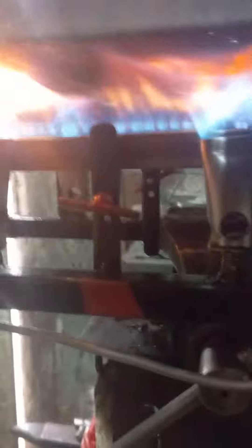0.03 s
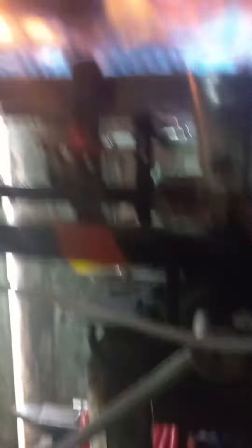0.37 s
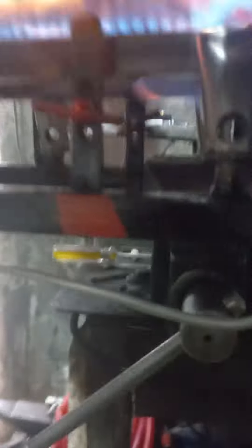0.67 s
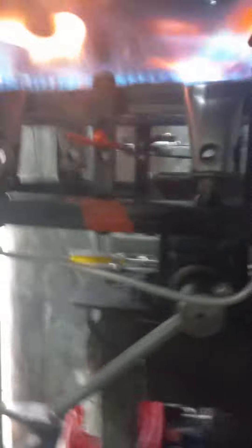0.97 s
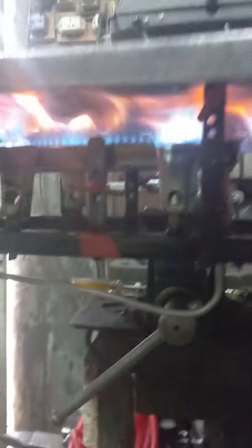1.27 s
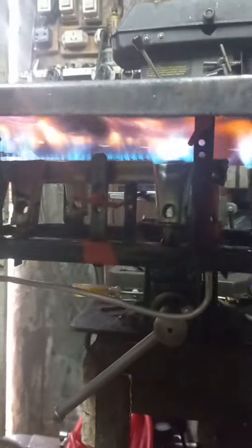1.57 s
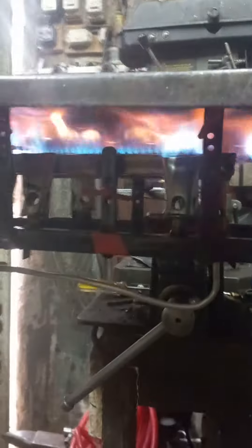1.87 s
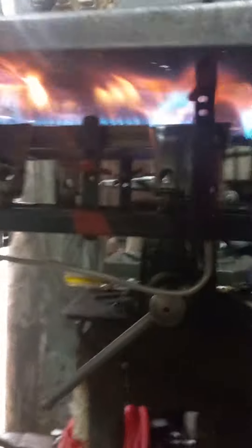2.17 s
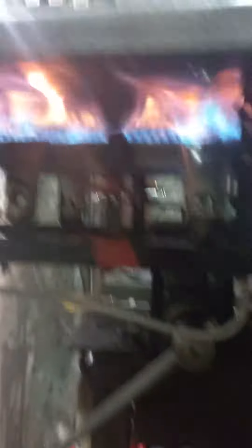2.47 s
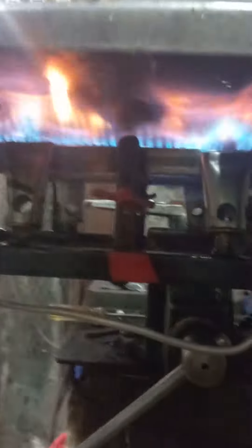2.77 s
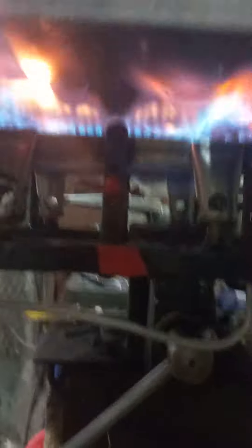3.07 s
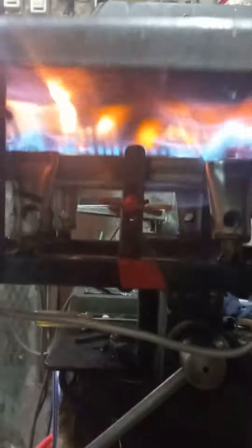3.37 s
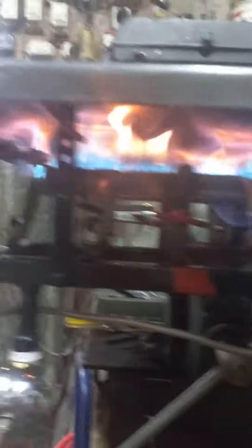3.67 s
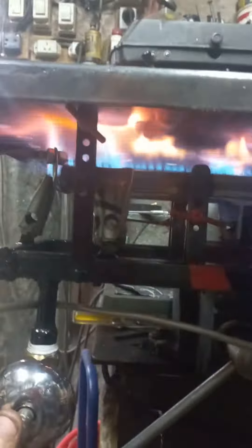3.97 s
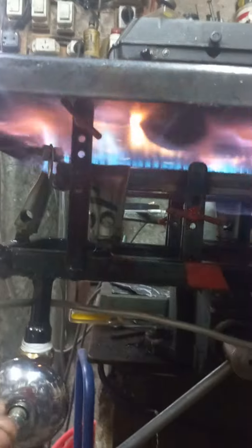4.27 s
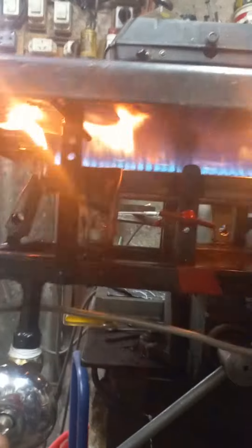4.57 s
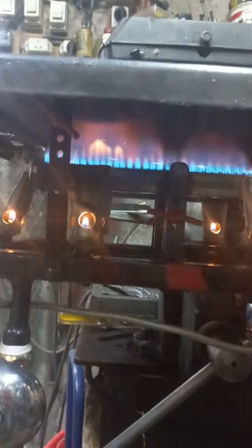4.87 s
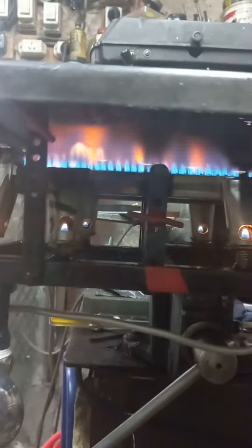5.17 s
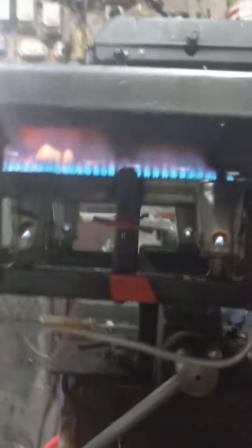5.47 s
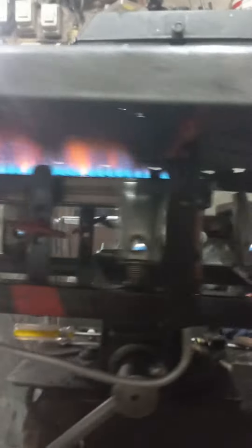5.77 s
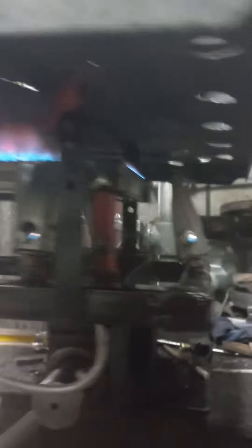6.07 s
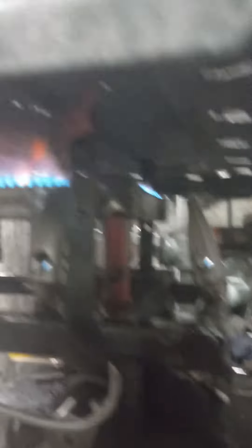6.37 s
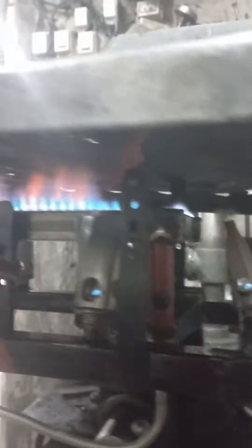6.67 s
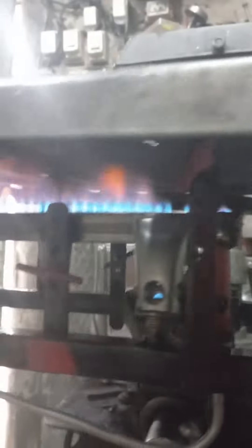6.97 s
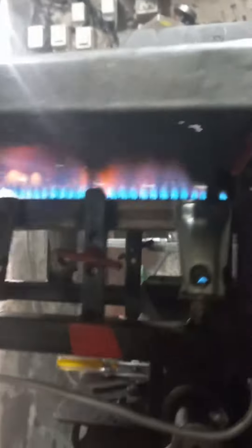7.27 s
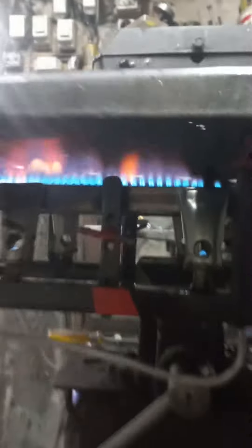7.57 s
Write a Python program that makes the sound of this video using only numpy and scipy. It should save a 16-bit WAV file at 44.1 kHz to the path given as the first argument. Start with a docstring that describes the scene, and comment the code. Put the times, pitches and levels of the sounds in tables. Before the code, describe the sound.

Loud, rumbling gas flames with a few metal ticks suddenly drop to near quiet, leaving a thin hiss and soft puffs.

```python
"""In a workshop, a long gas burner roars under a steel plate, heard from a phone in a shifting grip.
Turbulent flames boom and flutter in the room, the gas jets hiss, and hot metal ticks now and then.
The valve is turned down: small flames murmur and puff, and a thin flow sings in the mixing tubes.
The tone shifts as the phone sways and travels along the burner; hand and sleeve brush against it."""
import sys
import numpy as np
from scipy import signal
from scipy.fft import rfft, irfft
from scipy.io import wavfile

SR = 44100
rng = np.random.default_rng(int(sys.argv[2]) if len(sys.argv) > 2 else 0)


def unload_audio(sound):
    """Save the sound as a 16-bit wav file, at the path given as the first command line argument."""
    columns = np.transpose(np.atleast_2d(sound))
    # keep every value between -1 and 1, then stretch to whole-number steps
    steps = np.round(np.clip(columns, -1, 1) * 32767)
    wavfile.write(sys.argv[1], SR, steps.astype(np.int16))


N = 336042
T, HZ = np.arange(N) / SR, np.maximum(np.arange(N // 2 + 1) * SR / N, 1)

# Tone curves of the noise layers. Each row: frequency in Hz, relative level in dB.
ROAR_TONE = [(20, -42), (40, -42.5), (52, -18), (72, -20), (100, -5.5), (150, -0.5), (260, -1), (330, -4.5),
             (480, -8.5), (660, -10.5), (820, -18), (1100, -29.5), (2000, -46.5), (5000, -77.5)]
FLUTTER_TONE = [(300, -24.5), (700, 1), (1000, 3), (1250, -2.5), (1500, -4), (1850, -6.5), (2300, -17.5),
                (3200, -15.5), (6000, -31), (16000, -40.5)]
RUSH_TONE = [(1200, -19.5), (2200, 5), (2800, -1), (3500, 3.5), (4200, -0.5), (5000, -5.5), (6200, -9),
             (7500, -12.5), (10000, -28.5)]
JET_TONE = [(3000, -36), (6000, 1), (7200, -11.5), (8300, -7.5), (9600, -0.5), (11000, -2), (12300, 0),
            (13500, -2.5), (15600, -2)]
MURMUR_TONE = [(20, -21.5), (42, -25), (62, -6), (105, 3.5), (150, -2.5), (200, -3), (350, -9.5),
               (600, -11.5), (900, -15), (2500, -22.5), (5000, -27.5), (16000, -38)]
THIN_JET_TONE = [(1000, -22), (2200, -13), (4700, -18), (5400, -4), (6400, -.5), (7400, -4), (8400, -10),
                 (9600, -6.5), (10400, -3), (11600, -2.5), (12700, -5.5), (13600, 0), (15700, -.5)]
# The full flame's image at the phone's two ports. Each row: frequency in Hz, left minus right in dB.
PORT_BALANCE = [(100, 0), (580, 0.5), (820, -6), (1030, -4), (1280, -8), (1900, -6.5), (2500, -0.5),
                (3600, -2), (4500, -6.5), (5900, -8), (7200, -2), (11700, -11), (13400, -7.5),
                (15500, -13.5)]
# Standing waves between plate, bench and walls; the dips are cancelling echoes.
# Each row: centre in Hz, width in Hz, boost in dB.
ROOM_MODES = [(218.8, 7.9, -3.5), (235.5, 34, 4), (247, 18, -0.5), (324, 32, -4), (357, 26.5, 3.5),
              (402, 8.7, 4), (421, 23, -6.5), (437, 13, 6), (511, 62, 1.5), (558, 24.85, -5.5),
              (602.3, 47, 2.5), (898, 60, -0.5)]
# Crests and nodes of the room that the phone drifts through.
# Each row: centre in Hz, width in Hz, boost in dB, peak time and half length in seconds.
ROOM_NODES = [(720, 110, 0, 0.75, 0.25), (365, 35, 2, .55, .25), (1950, 240, -4, 0.05, .2),
              (805, 35, -2.5, 1.5, .3), (921.5, 45, -6.5, 1.8, .55), (1540, 40, -1, 1.55, .4),
              (1885, 36, 4, 3.2, .45), (835, 25, 3.5, 3.7, .55), (660, 70, -2, 2.9, .4),
              (420, 39, -2, 4.3, .3), (890, 35, -4, 4.1, .5), (3500, 380, 1, 1.5, 0.44)]
# Mixing tube resonances. Each row: place along the burner from 0 to 1, pitch and width in Hz, level in dB.
TUBE_MODES = [(0, 1850, 55, -86), (0, 1478, 28, -91.5), (0, 1676, 22, -80.5), (.45, 1660, 28, -75.5),
              (.53, 1772, 30, -82), (.77, 1760, 36, -83.5), (.83, 1557, 30, -80.5), (.92, 1573, 22, -80),
              (1.0, 1310, 34, -81)]
# Whistles of the throttled jets.
# Each row: pitch and width in Hz, relative level in dB, peak time and half length in seconds.
JET_WHISTLES = [(5690, 83, -9.5, 4.5, 0.5), (5440, 330, -9.5, 5.9, .35), (5640, 30, -14, 6.2, 0.15),
                (5450, 60, -12, 6.75, 0.25), (5480, 320, -9, 7, 0.41), (5890, 62, -13.5, 6.8, 1.3),
                (3840, 90, -19, 6.6, 0.3), (7900, 100, -13.5, 6.22, .2), (7850, 90, -16.5, 6.9, .2),
                (7780, 70, -24, 5.2, 1.1), (10700, 350, -15, 4.8, .6), (10600, 600, -15, 7.8, .4),
                (11700, 250, -16.5, 4.7, .3), (14200, 300, -11.5, 5.7, .3), (14250, 330, -8, 7.15, .35),
                (15600, 150, -12, 6.4, .6)]
# Bouts of sputtering. Each row: peak time and half length in seconds, boost in dB.
SPUTTER_BOUTS = [(0.575, 0.096, 14), (0.872, 0.075, 1.5)]
# Puffs of the small flames. Each row: start in seconds, level in dB, centre in Hz, decay in seconds.
FLAME_PUFFS = [(4.8, -65, 151, 0.048), (4.943, -70.5, 160, .043), (5.123, -61, 215, 0.012),
               (5.259, -64, 200, .011), (6.416, -62.5, 255, 0.013), (6.58, -66, 270, .022),
               (6.63, -75, 280, 0.09)]
# Ticks of hot metal. Each row: start in seconds, click level and ring level in dB, centre in Hz,
# width in octaves, ring decay in seconds.
METAL_TICKS = [(0.2165, -30, -36.5, 13500, .35, 0.0066), (.6055, -29, -38, 3700, .25, .004),
               (0.9183, -21, -38.5, 2300, .55, .0025), (0.9182, -28.5, -40, 12500, .45, .0015),
               (0.9247, -27, -41, 2000, .35, .003), (1.728, -37, -45, 12500, .45, .008),
               (2.5022, -26, -30, 14000, .4, 0.0014), (2.5064, -21, -32, 15000, .34, .002),
               (4.494, -50, -56, 9700, .15, .002), (4.635, -60, -67, 9030, .5, .005)]
# The phone's sway at full flame.
# Each row: time in seconds, closeness boost in dB, how squarely it faces the tube mouths from 0 to 1.
PHONE_SWAY = [(0, 3.5, 0.35), (.2, 1, 0.45), (.5, 3, 0.59), (.85, 2.5, 0.44), (1.2, 0.16, 0.05),
              (2.05, 0.27, 0.01), (2.35, 2, 0.15), (2.7, 1.23, 0.03), (3.65, 2.1, 0), (4.38, 0, 0.07)]
# Its path at low flame, along the burner and half way back. Each row: time in seconds, place from 0 to 1.
PHONE_PATH = [(5.15, 0.08), (5.45, 0.23), (5.62, 0.44), (5.95, 0.67), (6.22, .9), (6.42, 0.95),
              (6.75, 0.87), (7.2, 0.74), (7.42, 0.7), (7.62, 0.37)]
# Strokes of hand and sleeve. Each row: start and length in seconds, level in dB, centre in Hz,
# width in octaves, left minus right in dB.
GRIP_STROKES = [(.26, 0.033, -39, 2100, 0.69, 6), (.263, 0.026, -44, 11500, 0.5, -1),
                (2.227, 0.055, -47.5, 13000, .7, -10), (5.556, .03, -79, 3000, 0.66, 7),
                (5.768, 0.18, -81, 3500, 0.6, 12), (5.847, 0.078, -76, 3600, 0.52, 10)]

VALVE_AT_S, VALVE_TURN_S, VALVE_POWER, ROOM_T60_S = 4.384, 0.18, 1.7, 0.31
# layer faders, ahead of sway, flicker and panning
ROAR_DB, BOOM_DB, FLUTTER_DB, RUSH_DB, JET_DB, SPUTTER_DB = -25, -27.5, -35.5, -47, -49, -58
HISS_DB, MURMUR_DB, BODY_DB = -67, -75.5, -82.5
# facing the tube mouths lifts the rush, ducks and widens the flutter, and pans the treble left
FACING_RUSH_DB, FACING_FLUTTER_DB, FACING_LAG_MS, FACING_PAN_DB = 2, -3, .3, 5.5
PLATE_LAG_MS, PLATE_ECHO_GAIN = 1.77, .14  # the lag shrinks as the phone comes nearer
BEND_DELAY_S, BEND_REF_HZ = .0015, 2000  # travel time of the plate's bending waves at one pitch
SNAP_HZ, SNAP_S, SNAP_DB, POP_S, POP_DB = 850, .0063, -4, .0025, 7
TOP_HZ = 15700


def full_flame():
    """The big flame and its jets, coloured by plate and room and moving with the phone's sway."""
    flow = gas_flow()
    near_db, facing = curves(PHONE_SWAY)
    pan_db = 0.5 + FACING_PAN_DB * facing
    ports = pan(20 * np.log10(colour(PORT_BALANCE)))
    # big tongues of flame swell slowly, small eddies burn out in quick spurts
    tongues, eddies = walk(32), walk(130)
    lows = roar(tongues, eddies, facing, ports) * flow ** 0.92 * pan(0.306 * pan_db)
    mids = flutter(tongues, eddies, facing, ports) * flow * pan(pan_db)
    highs = rush(tongues, eddies, facing, ports) * flow ** 0.8 * pan(pan_db)
    jets = jet_hiss(ports) * flow ** 0.85 * pan(pan_db)
    flames = plate_echo(lows + mids + highs, PLATE_LAG_MS * undb(-near_db))
    return (standing_waves(flames) + jets) * undb(near_db)


def roar(tongues, eddies, facing, ports):
    """The low end: burning eddies rumble in the room, and a deep boom comes out of the tube mouths."""
    rumble = shaped(turbulence() * undb(1.5 * eddies), colour(ROAR_TONE, ROOM_MODES) * ports)
    boom = shaped(turbulence(), octave_band(140, octaves=0.44)) * facing
    return (rumble * undb(ROAR_DB) + boom * undb(BOOM_DB)) * undb(0.33 * tongues)


def flutter(tongues, eddies, facing, ports):
    """The midrange: turbulent flame noise that flaps with each tongue of fire."""
    noise = turbulence(alike_hz=1930, lead_s=0.00018) * undb(0.71 * eddies)
    left, right = shaped(noise, colour(FLUTTER_TONE, ROOM_MODES) * ports)
    widened = np.array([left, delayed(right, FACING_LAG_MS * facing)])
    return widened * undb(FLUTTER_DB + FACING_FLUTTER_DB * facing + tongues)


def rush(tongues, eddies, facing, ports):
    """The bright edge: rushing gas that surges with the flames."""
    noise = shaped(turbulence() * undb(1.2 * eddies), colour(RUSH_TONE) * ports)
    return noise * undb(RUSH_DB + FACING_RUSH_DB * facing + 0.94 * tongues + .5 * walk(7.7))


def jet_hiss(ports):
    """The air on top: the jets that feed the flames hiss with a flicker of their own."""
    noise = shaped(turbulence() * undb(0.86 * walk(90)), colour(JET_TONE) * ports)
    return noise * undb(JET_DB + 0.96 * walk(10))


def mouth_ring():
    """The rushing gas rings faintly and unevenly in one tube mouth while the phone points into it."""
    ring = narrow_band(3620, width_hz=170) * swell(s=.22, half_s=.16)
    return ring * undb(-48 + 2 * walk(20)) * gas_flow()


def sputter(per_s=600, spread_db=6):
    """Tiny pockets of gas burn out with a crack; together they rasp, harder in bouts."""
    level_db = SPUTTER_DB + sum(db * bell(T, s, half_s) for s, half_s, db in SPUTTER_BOUTS)
    cracks = (rng.random((2, N)) < per_s / SR) * rng.choice([-1, 1], (2, N))
    cracks = cracks * undb(spread_db * rng.standard_normal((2, N)))
    return shaped(cracks, octave_band(2300, octaves=0.7)) * undb(level_db) * gas_flow() * pan(2.3)


def gas_flow():
    """The big flame's envelope: steady at 1, then shut in one quick turn, with the room's short tail."""
    since = np.maximum(T - VALVE_AT_S, 0)
    opening = np.maximum(1 - since / VALVE_TURN_S, 0) ** VALVE_POWER
    return np.maximum(opening, undb(-60 * since / ROOM_T60_S))


def valve_hiss(s=4.5, half_s=.038):
    """Gas hisses briefly through the narrowing valve."""
    return shaped(turbulence(), octave_band(3600, octaves=.35)) * bell(T, s, half_s) * undb(-57.5)


def low_flame():
    """As the roar fades, small flames murmur and the throttled gas sings in tubes and jets."""
    tubes = mixing_tubes() * pan(-10)
    beam = pan(1.5 - 14 * HZ / TOP_HZ)  # the shortest waves beam to the right
    hiss = shaped(turbulence(), colour(THIN_JET_TONE) * beam) + undb(-2) * whistles()
    hiss = hiss * undb(HISS_DB + 0.43 * walk(8))
    murmur = shaped(turbulence(alike_hz=350), colour(MURMUR_TONE))
    murmur = murmur * undb(MURMUR_DB + walk(21)) * pan(2.2)
    return (1 - gas_flow()) * (tubes + hiss + murmur)


def mixing_tubes(reach=0.093, far_end_db=5.5):
    """The thin flow rings the hollow burner body and each tube, loudest as the phone passes that tube."""
    place, = curves(PHONE_PATH)
    out = shaped(turbulence(), octave_band(1573, octaves=0.18)) * undb(BODY_DB + far_end_db * place)
    for at, hz, width_hz, db in TUBE_MODES:
        nearness = 1 / np.sqrt(1 + ((place - at) / reach) ** 4)
        out = out + narrow_band(hz, width_hz) * nearness * undb(db + 1.4 * walk(6))
    return out


def whistles():
    """Narrow bands of jet noise flicker, swelling as the phone drifts through their beams."""
    out = 0
    for hz, width_hz, db, s, half_s in JET_WHISTLES:
        flicker_db = 1.6 * walk(12)
        whistle = narrow_band(hz, width_hz) * swell(s, half_s) * undb(db + flicker_db)
        out = out + whistle * pan(-3 - 13 * hz / TOP_HZ)
    return out


def puffs(octaves=0.58):
    """The small flames puff with a dull thump, the quick ones with a pop and a snap on top."""
    out, source = 0, turbulence()
    for s, db, hz, decay_s in FLAME_PUFFS:
        rise_s, age = 0.15 * decay_s, np.maximum(T - s, 0)
        thump = burst(source, s, hz, octaves, rise_s, decay_s)
        snap = burst(source, s, SNAP_HZ, octaves, rise_s, SNAP_S) * undb(SNAP_DB)
        pop = np.sin(2 * np.pi * hz * age) * age / POP_S * np.exp(1 - age / POP_S) * undb(POP_DB)
        bite = undb(-400 * decay_s)  # slower puffs have a softer attack
        out = out + undb(db) * (thump + (snap + pop) * bite)
    return out


def ticks():
    """Hot metal ticks as it expands: a hard click and a short rough ring."""
    out, source = 0, turbulence()
    for s, click_db, ring_db, hz, octaves, decay_s in METAL_TICKS:
        ring = burst(source, s, hz, octaves, rise_s=.0001, decay_s=decay_s, echo_db=-20.5, echo_s=.025)
        tick = plate_click(s, hz, octaves) * undb(click_db) + ring * undb(ring_db)
        out = out + tick * pan(-3.5 * np.log2(hz / 6000))  # higher ticks lean to the right
    return out


def plate_click(s, hz, octaves):
    """High bending waves cross the plate first, stretching a click into a tiny downward chirp."""
    cycles = HZ * s + 2 * BEND_DELAY_S * np.sqrt(BEND_REF_HZ * HZ)
    click = irfft(octave_band(hz, octaves) * np.exp(-2j * np.pi * cycles), N)
    return click / np.abs(click).max()


def brushes(edge_s=.022, grain_db=1.7):
    """Handling noise: short grainy strokes of friction as the grip on the phone shifts."""
    out, source = 0, turbulence() * undb(grain_db * walk(250))
    for s, length_s, db, hz, octaves, pan_db in GRIP_STROKES:
        contact = np.clip(np.minimum(T - s, s + length_s - T) / edge_s + .5, 0, 1)
        out = out + shaped(source, octave_band(hz, octaves)) * contact * undb(db) * pan(pan_db)
    return out


def plate_echo(x, lag_ms):
    """The steel plate returns the sound a moment later; the hollow colour sweeps as the phone sways."""
    return x + PLATE_ECHO_GAIN * np.array([delayed(port, lag_ms) for port in x])


def standing_waves(x):
    """The phone drifts through crests and nodes of the room: single pitches swell or hollow out."""
    spectrum, out = rfft(x), x
    for hz, width_hz, db, s, half_s in ROOM_NODES:
        band = irfft(spectrum * bell(HZ, hz, width_hz), N)
        out = out + band * (undb(db * swell(s, half_s)) - 1)
    return out


def turbulence(alike_hz=1700, lead_s=0.00012):
    """White pressure noise at two ports: long waves reach both alike, the left one a little sooner."""
    left, other = rfft(rng.standard_normal((2, N)))
    shared = .992 / (1 + (HZ / alike_hz) ** 2)
    right = shared * left * np.exp(-2j * np.pi * HZ * lead_s) + np.sqrt(1 - shared ** 2) * other
    return irfft(np.array([left, right]), N)


def burst(source, s, hz, octaves, rise_s, decay_s, echo_db=-21, echo_s=.04):
    """A short hit in one band, dying fast, with a faint tail from the room."""
    age = np.maximum(T - s, 0)
    fade = np.exp(-age / decay_s) + undb(echo_db) * np.exp(-age / echo_s)
    return shaped(source, octave_band(hz, octaves)) * (1 - np.exp(-age / rise_s)) * fade


def narrow_band(hz, width_hz):
    """Stereo noise in one resonance."""
    return shaped(rng.standard_normal((2, N)), 1 / (1 + ((HZ - hz) / width_hz) ** 2))


def octave_band(hz, octaves):
    """A band-pass curve, bell-shaped in pitch."""
    return np.exp(-.5 * (np.log2(HZ / hz) / octaves) ** 2)


def colour(points, modes=()):
    """An EQ curve: a smooth tone with bell-shaped resonances on it."""
    hz, db = np.transpose(points)
    bells = sum(peak * np.exp(-2 * ((HZ - f) / width) ** 2) for f, width, peak in modes)
    return undb(np.interp(np.log(HZ), np.log(hz), db) + bells)


def shaped(x, gain):
    """Filter by a gain curve and bring to rms 1."""
    y = irfft(rfft(x) * gain, N)
    return y / y.std()


def walk(rate_hz):
    """Smooth random modulation with spread 1."""
    return shaped(rng.standard_normal(N), bell(HZ, 0, rate_hz))


def bell(axis, centre, width):
    """A smooth bump in time or frequency."""
    return np.exp(-((axis - centre) / width) ** 2)


def swell(s, half_s):
    """A flat-topped fade in and out around a moment."""
    return 1 / np.sqrt(1 + ((T - s) / half_s) ** 4)


def curves(table):
    """Automation curves from rows that start with a time."""
    s, *columns = np.transpose(table)
    return [np.interp(T, s, column) for column in columns]


def delayed(x, lag_ms):
    """One channel through a moving delay."""
    return np.interp(T - lag_ms / 1000, T, x)


def pan(db):
    """Left and right gains for a level difference; positive leans left."""
    return undb(np.vstack([db, -db]) / 2)


def undb(db):
    """Decibels to gain."""
    return 10 ** (np.asarray(db) / 20)


def scene():
    """The mix: the burner at both settings, its ticks and puffs, and the hand on the phone."""
    burner = full_flame() + mouth_ring() + sputter() + valve_hiss() + low_flame()
    return burner + ticks() + puffs() + brushes()


def record(dry):
    """The phone cuts off the top end."""
    return signal.sosfilt(signal.ellip(14, .1, 80, TOP_HZ, fs=SR, output="sos"), dry)


dry = scene()
out = record(dry)
unload_audio(out)
```